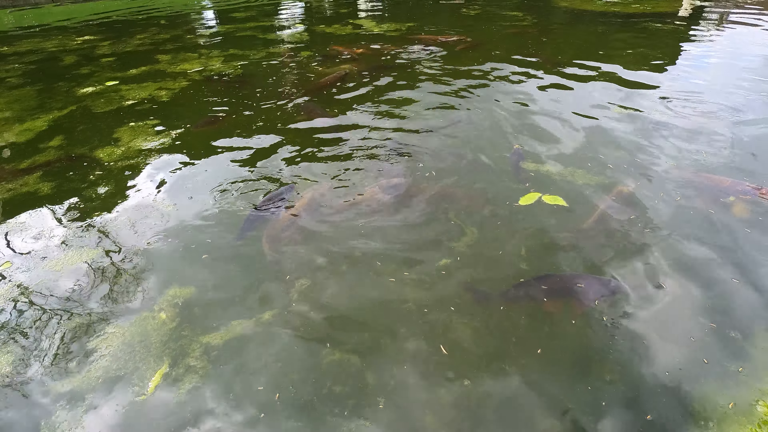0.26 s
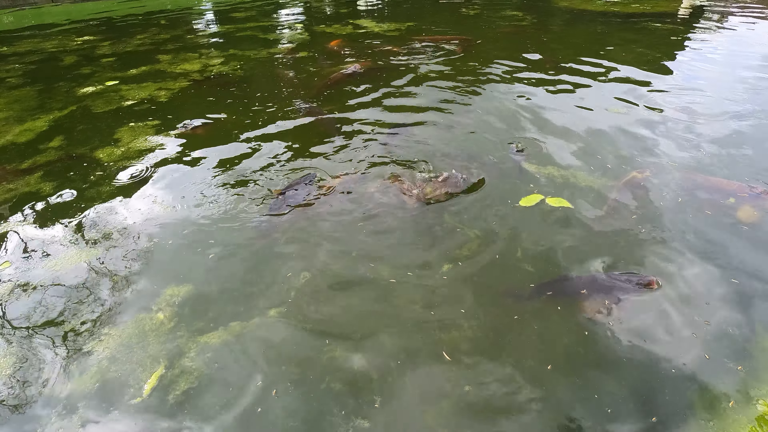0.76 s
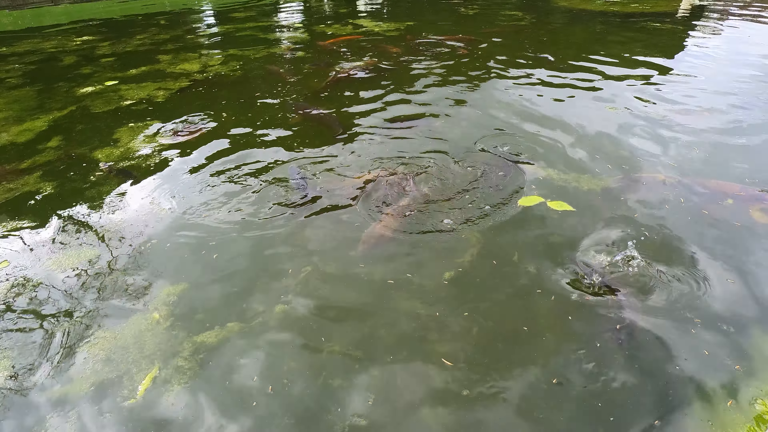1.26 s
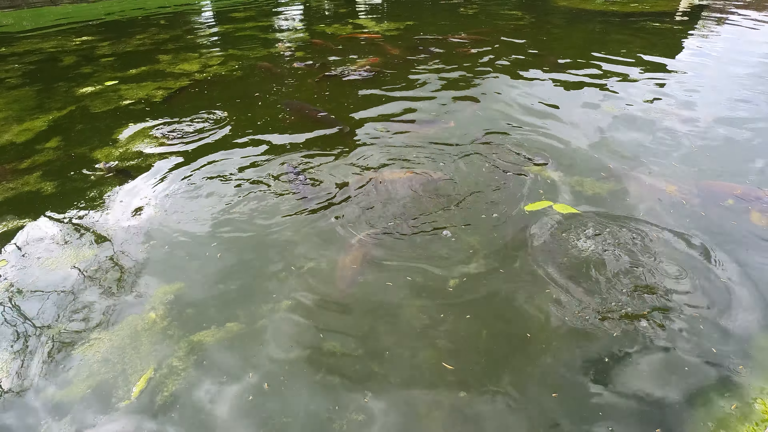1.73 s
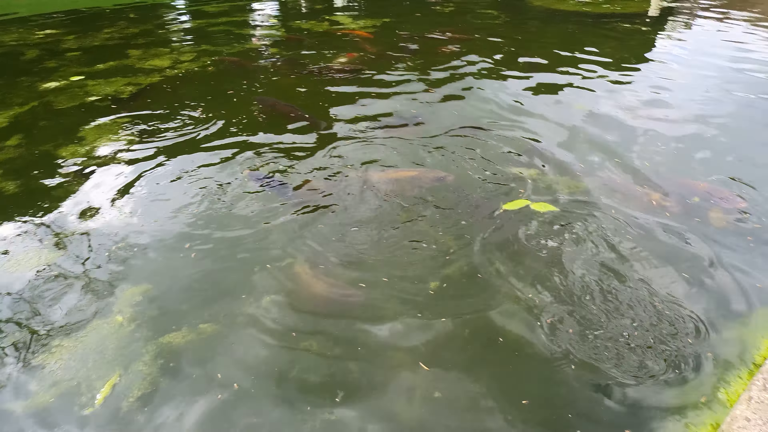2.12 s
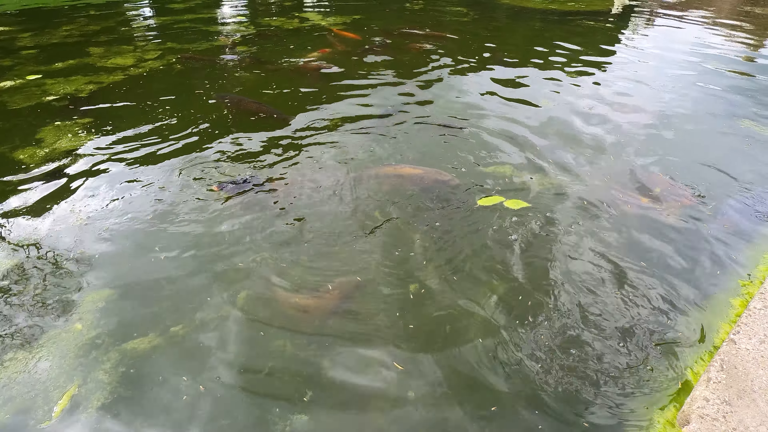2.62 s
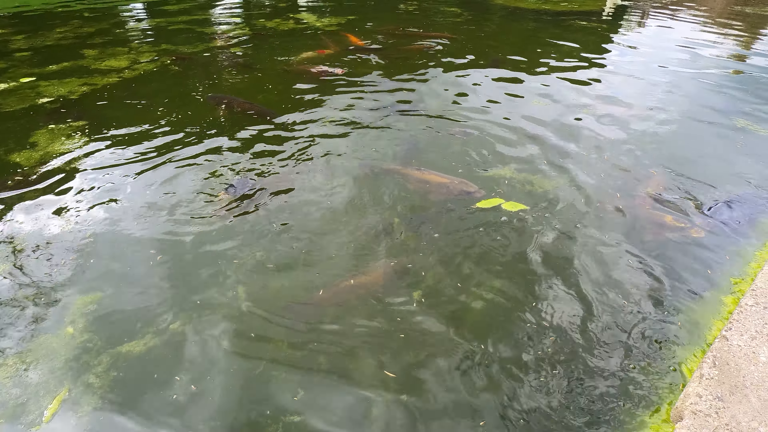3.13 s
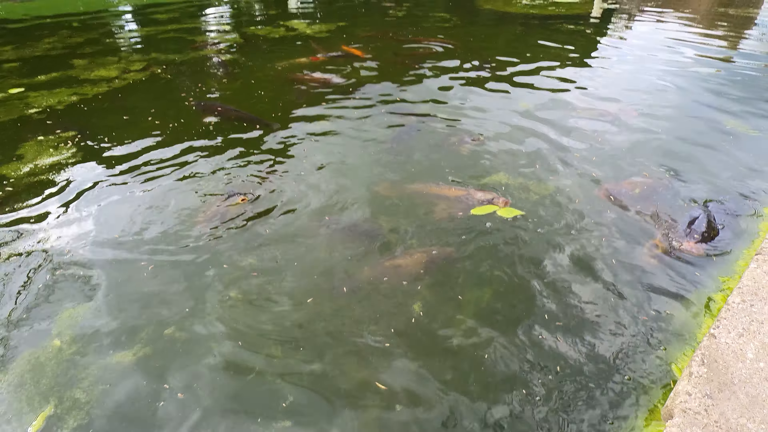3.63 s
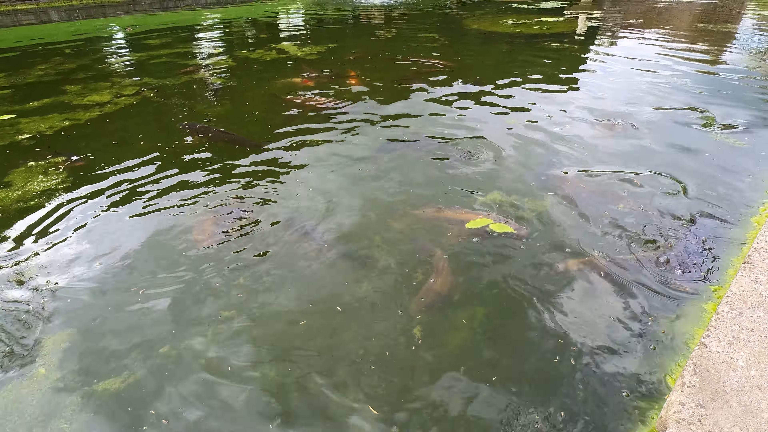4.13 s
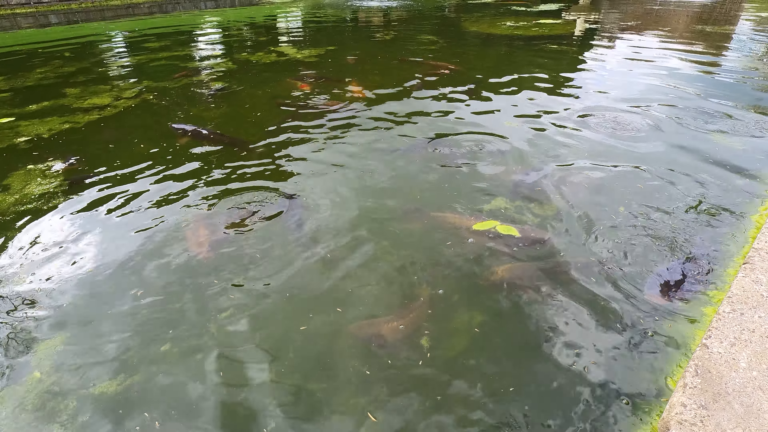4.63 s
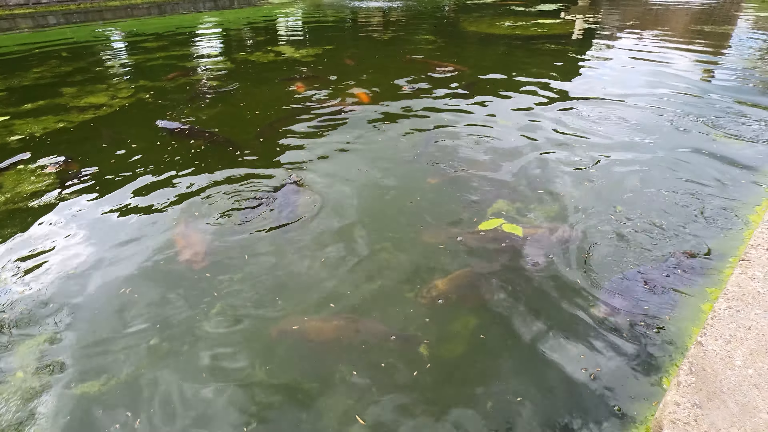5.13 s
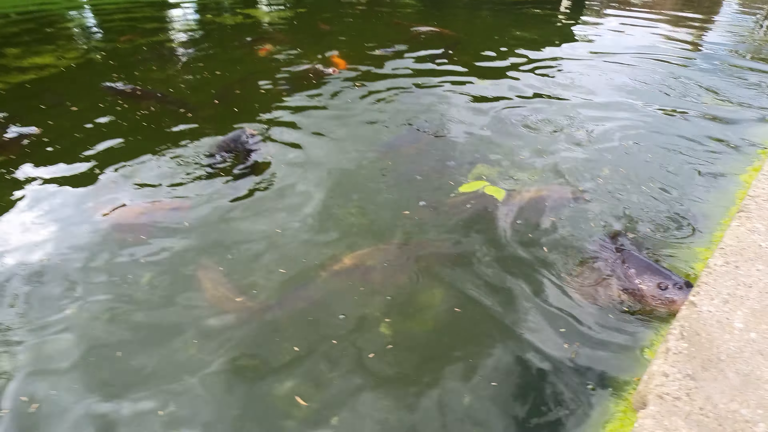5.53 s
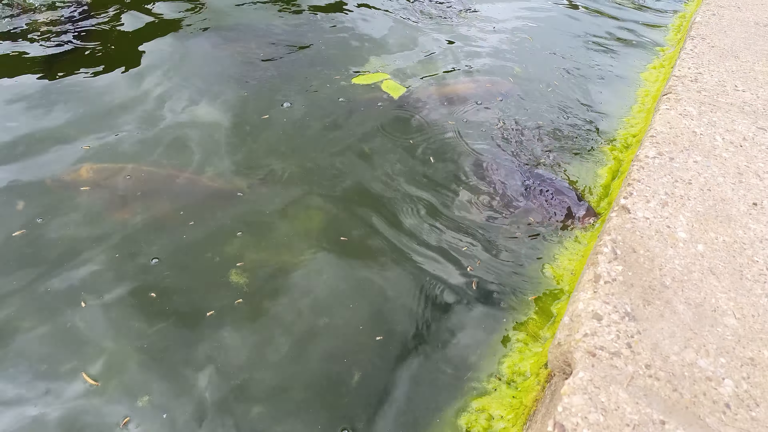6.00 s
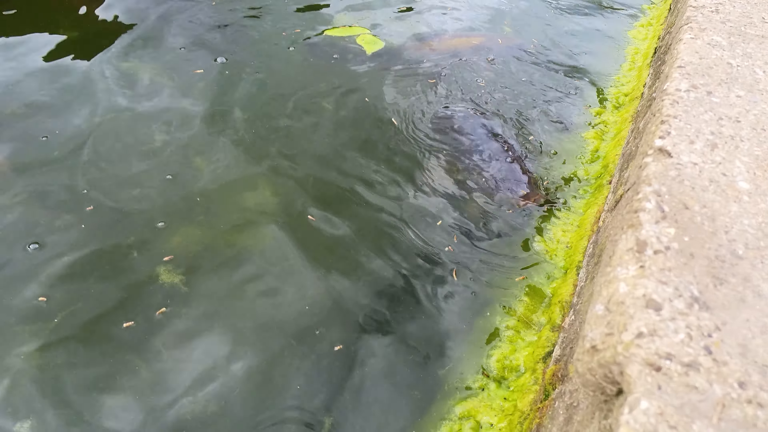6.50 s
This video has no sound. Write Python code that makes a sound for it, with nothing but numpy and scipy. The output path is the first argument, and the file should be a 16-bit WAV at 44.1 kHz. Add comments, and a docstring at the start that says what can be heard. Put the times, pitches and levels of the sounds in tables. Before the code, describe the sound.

A handheld camera's casing clicks, rattles and scrapes in bursts, busiest near five seconds, with distant park noise and a brief bird whistle.

```python
"""First a knock on plastic: a hand shifts its grip on a small camera beside a pond where carp feed.
Slips, creak and shaking ring the housing modes straight into two microphones; fingers thump; noise bursts make
skin brushes and scratchy creaks. Behind: short gliding sines (a droplet, small grip creaks, high blips), one
wavering bird whistle, far park and traffic wash as banded noise, and a treble hiss, strongest on the right.
A limiter holds the peaks."""
import sys
import numpy as np
from scipy import signal
from scipy.io import wavfile
from scipy.ndimage import uniform_filter1d, minimum_filter1d

SR = 44100
rng = np.random.default_rng(int(sys.argv[2]) if len(sys.argv) > 2 else 0)


def log_audio(samples):
    """Write samples as a 16-bit WAV file to the path given in sys.argv[1]."""
    # one column per channel
    frames = np.atleast_2d(samples).T
    # limit to full scale, then quantise
    limited = np.clip(frames, -1, 1)
    pcm = np.round(limited * 32767).astype(np.int16)
    wavfile.write(sys.argv[1], SR, pcm)


N = 297851
T = np.arange(N) / SR

# Housing modes: (frequency [Hz], T60 [s], build-up [s], part [fraction dropped: 0 right shell, 1 left shell,
# 2 whole body], left gain [dB], right gain [dB], left phase [rad], right phase [rad])
HOUSING_MODES = [(103.2, 0.092, 0.0054, 2, -15, -12, 3, 0.43), (146, 0.07, 0.0044, 2.2, -25, -9, 3, 0.43),
                 (188.7, 0.047, 0.0012, 2, -8, 2.5, 1.6, 0.31),
                 (250.4, 0.04, 0.0022, 1.8, -15.5, -8, 1, 0.087),
                 (334, 0.024, 0.00074, 0.5, -10, -23, 1.4, 0.2),
                 (329.6, 0.011, 0.00055, 2, -15, 6.5, 1.5, 0.25),
                 (427, 0.034, 0.0018, 1, -0.5, -9, 1.5, -0.26), (528, 0.031, 0.0029, 1.5, -2, -6, 4, 0.3),
                 (628.7, 0.031, 0.0018, 0, -17.5, -3, 4.5, 0.22),
                 (710, 0.017, 0.0011, -0.5, -27, -6, 6, -0.53),
                 (800.8, 0.046, 0.00061, 0.5, -21.5, -3, -3.5, -0.89),
                 (928.5, 0.032, 0.0028, 0, -33, -7, -2, -0.28),
                 (1147, 0.025, 0.00072, 0, -25, -11.5, 0.4, -0.41),
                 (1400, 0.013, 0.00074, 0, -23, -9.5, 0.6, 0.021),
                 (1677, 0.015, 0.00066, 0, -29, -19, 1, 0.41)]
# Slips of the grip, mean drive: (time [s], right shell [dB], left shell [dB], body [dB])
GRIP_SLIPS = [(0.012, -6, -13, -13.5), (0.1922, -6, -10, -13.5), (0.3063, -10, -18, -18.5),
              (0.3227, -6, -23, -10.5), (0.3668, -8.5, -16, -13), (0.4473, -7, -12.5, -15.5),
              (1.9685, -6, -3.5, -23), (2.0452, -3, -8, -20), (2.1329, -10.5, -11.5, -21),
              (2.1536, -22, -19, -19), (2.178, -10.5, -12, -21), (2.1855, -20.5, -22, -20),
              (2.2456, -19, -30, -23), (2.3086, -13, -22.5, -20.5), (2.3987, -6, -17.5, -23),
              (2.8968, -17, -20.5, -24), (3.3006, -14, -21.5, -24), (3.7, -16, -27, -33),
              (3.7062, -18, -19.5, -32), (3.7121, -21, -27, -29), (3.7204, -13, -27, -46),
              (3.7309, -18, -22, -36), (3.7562, -15, -26, -30), (3.7785, -10, -14, -33),
              (3.7875, -22, -34, -23), (3.7939, -17, -27, -30), (3.841, -10.5, -11.5, -23),
              (3.8539, -11.5, -13, -14.5), (4.3538, -25.5, -31, -36), (4.384, -28, -25, -34),
              (4.902, -1.5, -1, -16), (4.983, -18, -33, -26.5), (5.0004, -13, -34, -24),
              (5.0278, -18.5, -30, -18), (5.0704, -5, -10.5, -25), (5.0767, -3, 0.3, -38),
              (5.0819, -14, -8, -29), (5.131, -2.5, -3.5, -19), (5.1739, -12, -9, -20),
              (5.2149, 0.3, -9, -23), (5.22, -17, -3, -26), (5.2672, -27, -26, -18),
              (5.2834, -28, -26, -21), (5.334, -8, -15, -16), (5.3435, -10, -19, -15),
              (5.364, -8, -21, -30), (5.4369, -12, -39, -36), (5.4748, -29, -45, -25),
              (5.4997, -13, -23, -28), (5.8023, -26, -28, -31)]
# Rubs of the hand: (start [s], hold [s], right creak drive [dB], right shaking drive [dB], left re right [dB])
HAND_RUBS = [(0.474, 0.082, -78, -57, -8.5), (0.67, 0.024, -81, -58.5, -15),
             (0.826, 0.081, -74, -63.5, -20), (1.005, 0.011, -78, -56, -24), (1.14, .004, -75, -56, -30),
             (1.225, 0.096, -66, -60, -9), (1.687, 0.055, -75, -57, -15), (1.838, 0.056, -66, -50, -24),
             (1.922, 0.042, -50, -55.5, -13), (2.215, 0.038, -59, -62, -12), (2.504, 0.019, -80, -59, -22),
             (2.849, 0.0093, -51.5, -52, -10.5), (2.894, 0.098, -66, -57.5, -14),
             (3.102, .015, -56.5, -58.5, -14), (3.196, 0.016, -54, -52.5, -6.5),
             (3.257, .1, -48.5, -55.5, -13.5), (3.394, 0.11, -58, -63.5, -16),
             (3.58, 0.046, -53, -61.5, -12.5), (3.69, .04, -54, -55.5, -18), (3.773, 0.096, -64, -60, -10),
             (3.932, .01, -53, -60, -10), (4.009, 0.011, -57, -58, -22), (4.19, .02, -78, -63.5, -16),
             (4.334, 0.043, -66, -58, -15), (4.717, 0.012, -84, -70, -18), (4.818, 0.0089, -77, -66, -15),
             (4.988, 0.014, -58, -47, -13), (5.048, 0.032, -53, -47, -1), (5.097, 0.17, -57.5, -55, -5),
             (5.266, 0.037, -48.5, -48.5, -13), (5.33, 0.029, -39, -44, -5.5),
             (5.376, 0.046, -46, -56, -18), (5.446, 0.057, -47, -54.5, -20), (5.54, .11, -51, -55, -13),
             (5.66, 0.0089, -53, -53, -17), (5.696, 0.062, -52, -57, -16), (5.795, 0.039, -48.5, -51.5, -8),
             (5.95, 0.073, -74, -71, -17), (6.171, .02, -77, -57.5, -24), (6.25, 0.12, -65, -64.5, -27),
             (6.403, 0.063, -58.5, -58, -16)]
# Soft finger bumps, before softening: (time [s], right level [dB], left level [dB], start frequency [Hz],
# end frequency [Hz], T60 [s], tick drive [dB])
FINGER_THUMPS = [(0.89, -28.5, -49, 151, 100, 0.21, -60), (1.021, -5, -26, 122, 58, 0.065, -14),
                 (1.1913, -2.5, -22, 112, 68, 0.07, -13.5), (3.195, -18.5, -34, 186, 145, 0.087, -28),
                 (3.943, -10.5, -28, 189, 158, 0.061, -53), (4.019, -29.5, -43, 180, 149, 0.068, -60),
                 (5.058, -6.5, -31, 151, 116, .08, -48), (5.076, -30, -9, 111, 92, 0.15, -64),
                 (5.368, -13, -30, 190, 160, 0.086, -40)]
# Skin brushes and bright scratchy grip creaks on the right: (centre [s], length [s], flutter [dB],
# scratch before top edge [dB], scratch top edge [Hz], treble [dB])
BRUSHES_AND_SCRATCHES = [(1.238, .006, -60, -50, 2500, -45), (1.264, .02, -45, -39, 4820, -48),
                         (2.034, 0.029, -24, -30, 4400, -46), (3.297, .08, -60, -38, 1800, -70),
                         (5.06, 0.022, -50, -30, 1780, -70), (5.217, 0.01, -60, -24, 1800, -70),
                         (5.332, 0.088, -58, -29, 1880, -70), (5.498, 0.036, -60, -34.5, 1830, -70),
                         (6.576, 0.021, -50, -52, 4400, -48)]
# Short soft tones: one rising droplet, small creaks of the grip and brief high blips:
# (time [s], start frequency [Hz], rise per length [octaves], length [s], right level [dB])
SHORT_TONES = [(0.791, 708, 0.82, 0.032, -41), (1.235, 560, .05, .02, -36), (1.31, 600, -.1, .03, -34),
               (4.05, 560, .05, .015, -36), (1.248, 1820, 0.11, .007, -28), (2.431, 1740, .2, 0.0045, -31)]
# Bird whistle: (time [s], mean frequency [Hz], level before side gains [dB])
BIRD_WHISTLE = [(6.335, 2320, -70), (6.345, 2340, -52), (6.365, 2520, -53), (6.39, 2540, -53),
                (6.412, 2420, -50.5), (6.52, 2390, -53), (6.56, 2300, -63)]
# Far wash, relative spectrum: (frequency [Hz], left density [dB per Hz], right density [dB per Hz],
# left-right likeness [0..1])
WASH_SPECTRUM = [(39.7, -30, -24, 0.61), (100, -9, -4.5, 1), (300, -22, -22, .35), (410, -20, -20, 0.4),
                 (576, 1.5, 5.5, 1), (737, -6.5, -5, 0.75), (1110, -11.5, -4, 0.76),
                 (1675, -3.5, -0.5, 0.98), (2500, -9, -6, 0.34), (3964, -16.5, -14.5, 0.23),
                 (5370, -33.5, -32, 0.17), (10400, -33, -30.5, 0.19), (11800, -43, -64, .05),
                 (15740, -25, -21.5, .05)]
# Treble hiss, right side, before flicker: (time [s], level [dB])
HISS_LEVEL = [(0.0, -54), (1.16, -53), (1.37, -52.5), (1.6, -55), (2.03, -54), (2.2, -50.5), (4.5, -51.5),
              (5.3, -53.5), (5.9, -49.5), (6.75, -49.5)]

RUB_RISE_DB_S, RUB_FALL_DB_S, RUB_WAVER_DB = 704, 550, 3.5
SHAKE_LEFT_DB = 8   # shaking reaches the left side better than creak
REST_DB = -84   # the hand is never quite still
# skin creeps just before a slip
CREEP_LEAD_S, CREEP_RIGHT_DB, CREEP_LEFT_DB, CREEP_SLOPE_DB_S = .006, -48, -54, 1500
SETTLE_RIGHT_DB, SETTLE_LEFT_DB, SETTLE_FALL_DB_S = -46, -55, 250   # the body settles after it
WASH_DB, WASH_LEFT_LAG_S = -44, .00005
HISS_EDGE_HZ, HISS_LEFT_DB = 11240, -33   # left is relative to right
LIMITER_CEILING, RELEASE_DB_S = .46, 78
TOP_STOP_HZ = 15900


def amp(db):
    """Decibels to amplitude."""
    return 10 ** (np.asarray(db) / 20)


def rms_one(x):
    """Scale to overall rms 1."""
    return x / np.sqrt(np.mean(x ** 2) + 1e-20)


def in_time(rows):
    """Interpolate table columns over the first, time [s]."""
    time_s, *columns = np.transpose(rows)
    return [np.interp(T, time_s, c) for c in columns]


def passband(x, low_hz, high_hz, order=2):
    """Butterworth band-pass."""
    return signal.sosfilt(signal.butter(order, [low_hz, high_hz], "band", fs=SR, output="sos"), x)


def drift(rate_hz):
    """Slow random wander, rms 1: two-pole smoothed noise, computed every 40 samples."""
    r = np.exp(-80 * np.pi * rate_hz / SR)
    noise = rng.standard_normal(N // 40 + 2002)
    slow = signal.lfilter([1], [1, -2 * r, r * r], noise)[2000:]   # drop the filter's start
    return np.interp(np.arange(N) / 40, np.arange(len(slow)), rms_one(slow))


def ring(push, hz, t60_s, build_s):
    """Complex ringing of one mode that builds up, then decays; the imaginary part is the sine."""
    turn = np.exp(2j * np.pi * hz / SR)
    build = np.exp(-1 / (build_s * SR))
    fed = signal.lfilter([1 - build], [1, -build * turn], push + 1e-18)
    return signal.lfilter([1], [1, -amp(-60 / (t60_s * SR)) * turn], fed)


def grains(per_s, spread_db):
    """Random clicks of uneven size and sign, rms 1."""
    size_db = spread_db * np.minimum(rng.exponential(1, N), 4)
    sizes = amp(size_db) * rng.choice([-1, 1], N)
    return rms_one(sizes * (rng.random(N) < per_s / SR))


def soften(x, hz):
    """A soft contact spreads each click over a short time."""
    r = np.exp(-2 * np.pi * hz / SR)
    return signal.lfilter([(1 - r) ** 2], [1, -2 * r, r * r], x)


def housing():
    """Slips, creak and shaking drive the same modes; each microphone hears a mode at its own level and phase."""
    rows = np.array(GRIP_SLIPS)
    at = np.round(rows[:, 0] * SR).astype(int)
    uneven_db = rng.normal(0, 2.43, (len(rows), len(HOUSING_MODES)))   # each slip grips a different spot
    creak_right, creak_left, shake_right, shake_left = handling()
    creak = [creak_right, creak_left]
    ticks = [grains(1400, spread_db=3.0) for _ in range(2)]   # stick-slip of skin at two places
    lumps = [soften(grains(500, spread_db=2), 260) for _ in range(2)]
    shaking = np.array([shake_left * (0.67 * lumps[0] + 1.07 * lumps[1]), shake_right * lumps[0]])
    out = np.zeros((2, N))
    for k, (hz, t60_s, build_s, part, left_db, right_db, left_rad, right_rad) in enumerate(HOUSING_MODES):
        part = int(part)
        # body: left and right rows; shell: one shared row
        rub = shaking if part == 2 else creak[part] * ticks[k % 2][None]
        slips = np.zeros(N)
        slips[at] = -amp(rows[:, 1 + part] + uneven_db[:, k])
        push = soften(rub, 2020) + soften(slips, 1300)   # fine ticks are shorter contacts than whole slips
        mode = ring(push, hz, t60_s, build_s)
        out[0] += amp(left_db) * (mode[0] * np.exp(1j * left_rad)).imag
        out[1] += amp(right_db) * (mode[-1] * np.exp(1j * right_rad)).imag
    return out


def handling():
    """Strength of creak and of shaking, right and left, from the rubs and from around each slip."""
    start_s, hold_s, creak_db, shake_db, left_db = np.transpose(HAND_RUBS)
    slip_s, right_shell_db, left_shell_db, body_db = np.transpose(GRIP_SLIPS)
    rub_db = [creak_db, creak_db + left_db, shake_db, shake_db + left_db + SHAKE_LEFT_DB]
    rubs = swells(start_s, hold_s, rub_db, RUB_RISE_DB_S, RUB_FALL_DB_S)
    creep_db = [right_shell_db + CREEP_RIGHT_DB, left_shell_db + CREEP_LEFT_DB]
    creep = swells(slip_s - CREEP_LEAD_S, 0, creep_db, CREEP_SLOPE_DB_S, CREEP_SLOPE_DB_S)
    settle_db = [body_db + SETTLE_RIGHT_DB, body_db + SETTLE_LEFT_DB]
    settle = swells(slip_s, 0, settle_db, CREEP_SLOPE_DB_S, SETTLE_FALL_DB_S)
    creak_waver, shake_waver = [amp(RUB_WAVER_DB * drift(23)) for _ in range(2)]
    wavers = [creak_waver, creak_waver, shake_waver, shake_waver]
    return [(rub + slip + amp(REST_DB)) * waver for rub, slip, waver in zip(rubs, creep + settle, wavers)]


def swells(start_s, hold_s, levels_db, rise_db_s, fall_db_s):
    """Sum of rise, hold and fall shapes, straight in dB; one gain curve per set of levels."""
    t = T[::64, None]
    rise_db = -rise_db_s * np.maximum(start_s - t, 0)
    fall_db = -fall_db_s * np.maximum(t - start_s - hold_s, 0)
    shape_db = rise_db + fall_db
    return [np.interp(T, t[:, 0], amp(shape_db + db).sum(axis=1)) for db in levels_db]


def thumps():
    """A sudden push swings out as one low ring that slackens in pitch, with a short tick on top."""
    low, tick = np.zeros((2, N)), np.zeros(N)
    t = np.arange(round(.15 * SR)) / SR
    for s, right_db, left_db, start_hz, end_hz, t60_s, tick_db in FINGER_THUMPS:
        hz = end_hz + (start_hz - end_hz) * np.exp(-t / 0.011)
        swing = amp(-60 * t / t60_s) * np.cos(2 * np.pi * np.cumsum(hz) / SR)
        i = round(s * SR)
        low[:, i:i + len(t)] += swing * amp([[left_db], [right_db]]) * [[-1], [1]]   # opposite polarity
        tick[i] = amp(tick_db)
    ticks = soften(passband(tick, 1040, 1580), 3300) * amp([[8], [24]])
    return soften(low, 800) + ticks


def brushes_and_scratches():
    """Short rough bursts of noise in three parts: low flutter, a scratch with a steep top edge, treble."""
    rough = rng.standard_normal(N) * amp(2.5 * drift(110))
    flutter = rms_one(passband(rough, 60, 400))
    scratch = rms_one(passband(rough, 1000, 1700, order=1))
    treble = rms_one(passband(rng.standard_normal(N), 12400, 17400))
    out = np.zeros(N)
    for s, length_s, low_db, scratch_db, top_hz, treble_db in BRUSHES_AND_SCRATCHES:
        edged = signal.sosfilt(signal.butter(6, top_hz, fs=SR, output="sos"), scratch)
        parts = amp(low_db) * flutter + amp(scratch_db) * edged + amp(treble_db) * treble
        out += np.exp(-((T - s) / (length_s / 2)) ** 2) * parts
    return out * amp([[-14], [0]])


def short_tones():
    """Each tone is a sine that glides, mostly upward, while it dies."""
    out = np.zeros(N)
    for s, hz, rise_oct, length_s, db in SHORT_TONES:
        t = np.arange(round(3 * length_s * SR)) / SR
        tone = np.sin(2 * np.pi * np.cumsum(hz * 2 ** (rise_oct * t / length_s)) / SR)
        envelope = np.exp(-1.5 * t / length_s) * np.minimum(t / 0.00089, 1)
        i = round(s * SR)
        out[i:i + len(t)] += amp(db) * tone * envelope
    return out * amp([[-4], [0]])


def bird():
    """One far whistle: a sine wavering in pitch and level."""
    hz, db = in_time(BIRD_WHISTLE)
    phase_rad = 2 * np.pi * np.cumsum(hz + 12 * drift(40)) / SR
    tone = np.sin(phase_rad) * amp(db + 2.2 * drift(40))
    sounding = (T > BIRD_WHISTLE[0][0]) & (T < BIRD_WHISTLE[-1][0])
    return tone * sounding * amp([[1.5], [3.5]])


def wash():
    """Third-octave bands of noise, each with its own level per side, likeness and slow patches."""
    table = np.array(WASH_SPECTRUM)
    edges_hz = 35 * 2 ** np.arange(0, 9.1, 1 / 3)
    white = rng.standard_normal((2, 2, N))   # neighbouring bands use unrelated noise
    together = drift(0.99)
    out = 0
    for k, (low_hz, high_hz) in enumerate(zip(edges_hz, edges_hz[1:])):
        mid, side = passband(white[k % 2], low_hz, high_hz)
        log_centre = np.log(low_hz * high_hz) / 2
        left_db, right_db, alike = [np.interp(log_centre, np.log(table[:, 0]), table[:, c]) for c in (1, 2, 3)]
        alike = np.clip(alike, 0, 1)
        pair = np.sqrt(1 + alike) * mid + np.sqrt(1 - alike) * side * [[1], [-1]]
        out = out + pair * amp([[left_db], [right_db]]) * amp(1.3 * together + 1.34 * drift(14))
    out = amp(WASH_DB) * rms_one(out)
    late_left = np.interp(T - WASH_LEFT_LAG_S, T, out[0])   # the sound reaches the right port first
    return np.array([late_left, out[1]])


def hiss():
    """Smooth noise above a steep edge, unrelated in the two microphones; its level flickers."""
    edge = signal.butter(8, HISS_EDGE_HZ, "high", fs=SR, output="sos")
    noise = signal.sosfilt(edge, rng.standard_normal((2, N)))
    level_db = in_time(HISS_LEVEL)[0] + 1.2 * drift(18)
    return rms_one(noise) * amp(level_db) * amp([[HISS_LEFT_DB], [0]])


def scene():
    """Sum of all sources, rows left and right."""
    return housing() + thumps() + brushes_and_scratches() + short_tones() + bird() + wash() + hiss()


def record(dry):
    """Low cut, a look-ahead limiter with a steady release on both channels, then the top is cut."""
    x = signal.sosfilt(signal.butter(4, 58, "high", fs=SR, output="sos"), dry)
    over_db = np.maximum(20 * np.log10(np.abs(x).max(axis=0) / LIMITER_CEILING + 1e-9), 0)
    released_db = RELEASE_DB_S * T
    held_db = np.maximum(np.maximum.accumulate(over_db + released_db) - released_db, 0)
    gain_db = minimum_filter1d(-held_db, size=89)   # lowest gain within 1 ms each way
    x = x * amp(uniform_filter1d(gain_db, size=45))
    return signal.sosfilt(signal.cheby2(20, 70, TOP_STOP_HZ, fs=SR, output="sos"), x)   # 70 dB down at the edge


dry = scene()
out = record(dry)
log_audio(out)
```